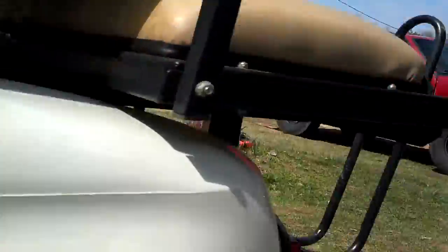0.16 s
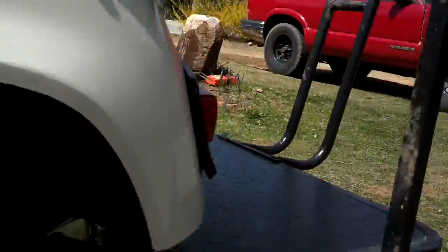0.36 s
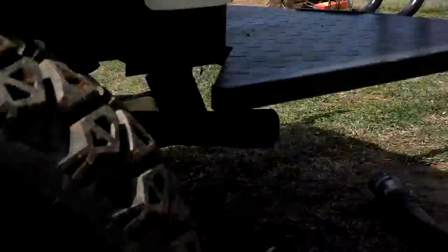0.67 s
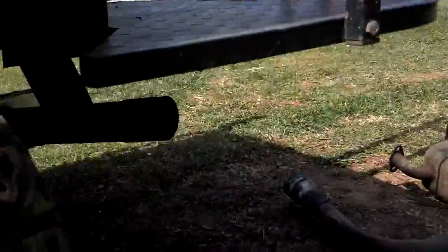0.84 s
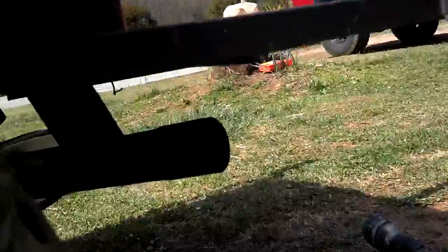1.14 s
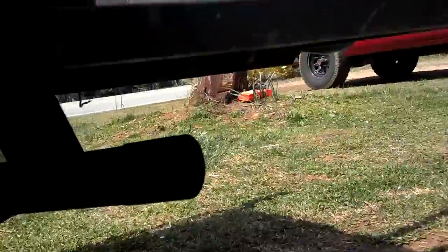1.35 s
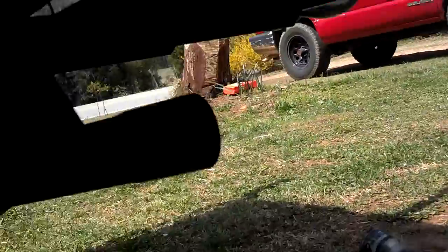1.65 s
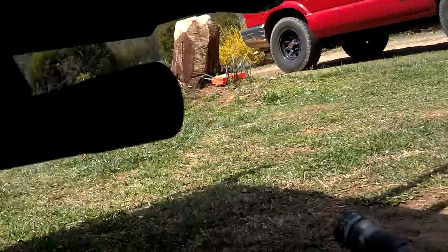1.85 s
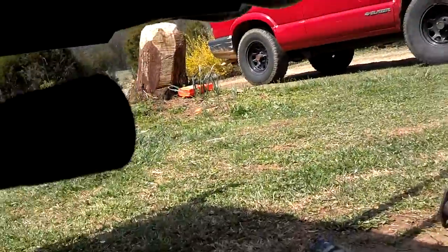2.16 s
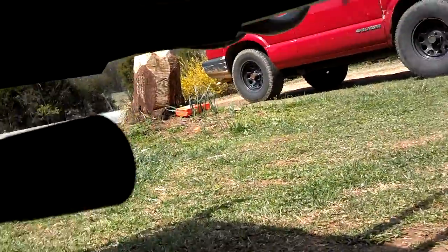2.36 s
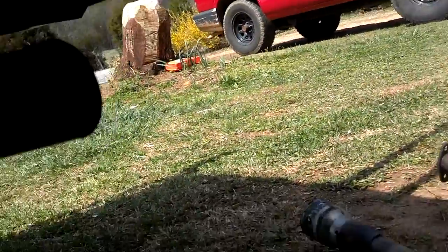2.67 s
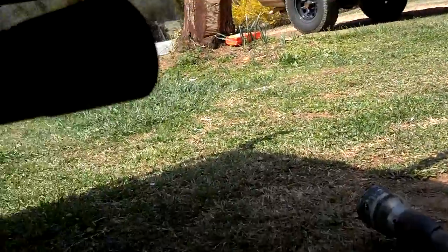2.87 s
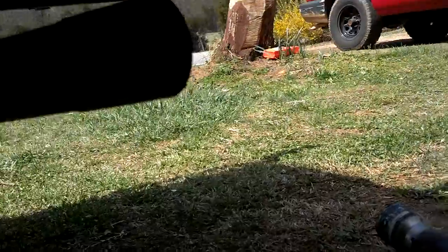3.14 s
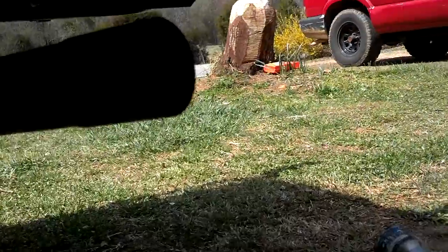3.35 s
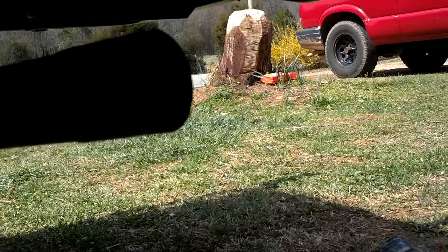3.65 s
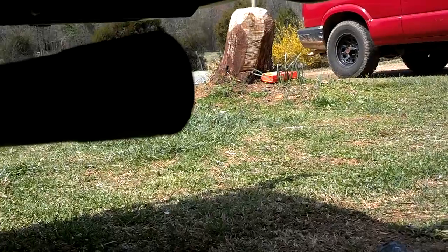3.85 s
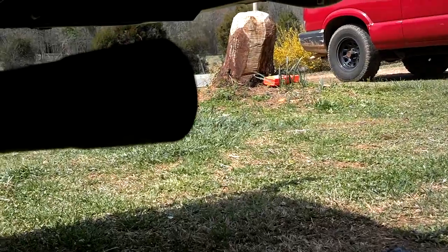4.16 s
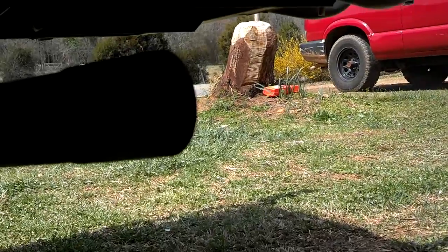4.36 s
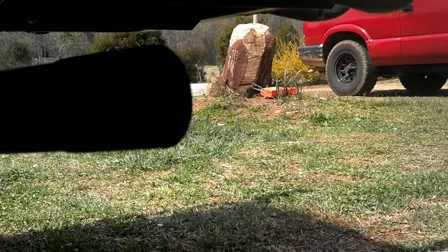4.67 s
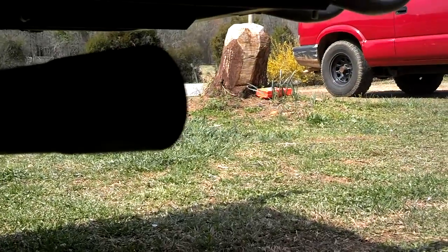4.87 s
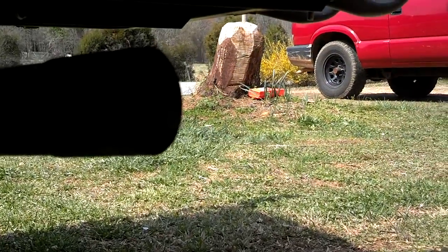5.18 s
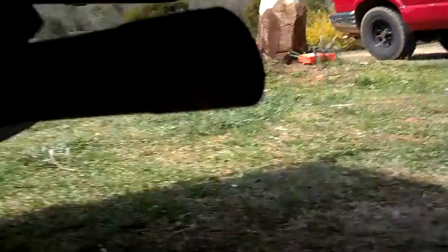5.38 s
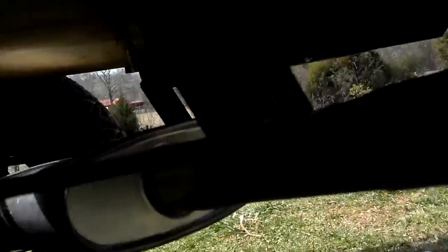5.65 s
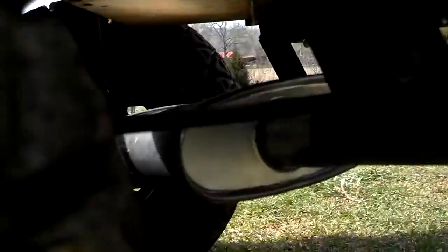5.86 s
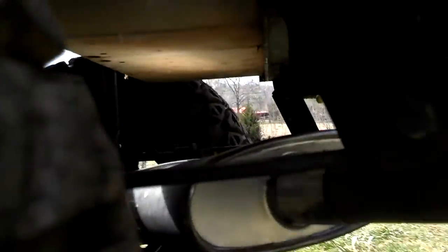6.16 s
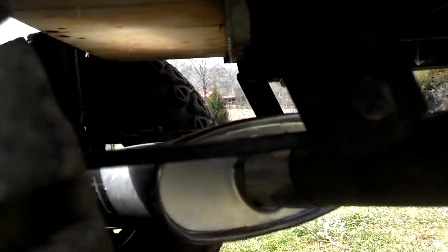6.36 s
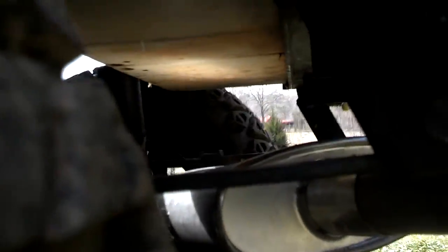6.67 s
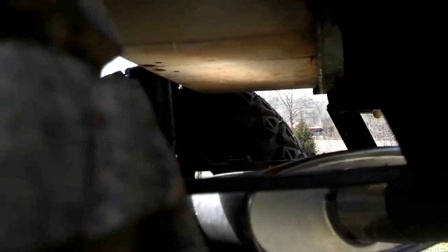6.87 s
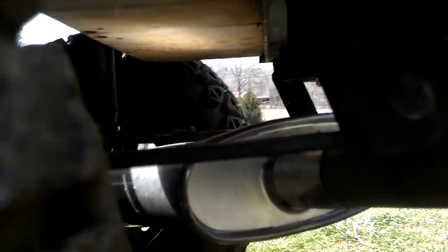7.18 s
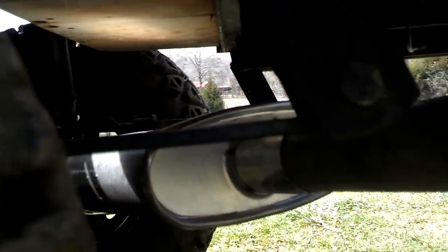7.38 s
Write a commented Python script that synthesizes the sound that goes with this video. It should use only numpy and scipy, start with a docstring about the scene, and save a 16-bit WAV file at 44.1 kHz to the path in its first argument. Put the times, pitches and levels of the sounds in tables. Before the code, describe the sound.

A golf cart's small petrol engine idles roughly outdoors through an open exhaust, coughs, then is revved three times with cracking roars and popping run-downs.

```python
"""A golf cart's small V-twin idles outdoors through an open exhaust, with loose bangs and ringing puffs.
It coughs as the pedal is touched, then is revved three times: each firing cracks and rushes from the pipe.
After each rev it coasts down, gulping and chuffing once a cycle; a few weak pops follow the first rev;
after the last two, gas pops once a cycle. Before the third rev the hand-held microphone pair moves from the
pipe mouth most of the way under the cart. Shaped noise makes the gas and the steady air rumble, filtered
clicks the cracks and thumps, sines the tones."""
import sys
import numpy as np
from scipy import signal
from scipy.fft import rfft, irfft, next_fast_len
from scipy.io import wavfile
from scipy.ndimage import uniform_filter1d

SR = 44100
rng = np.random.default_rng(int(sys.argv[2]) if len(sys.argv) > 2 else 0)


def transcribe(u):
    """Save the signal u as a 16-bit wav file named by the first command-line argument.

    u: samples, shape (n,) or (channels, n), limited to [-1, 1]; the rate is SR.
    q: integer samples, one column per channel.
    """
    v = np.clip(np.atleast_2d(u).T, -1, 1)
    q = np.round(v * 32767).astype(np.int16)
    wavfile.write(sys.argv[1], SR, q)


N = 331632
TIME_S = np.arange(N) / SR
FFT_SIZE = next_fast_len(N + 8192)
FREQS_HZ = np.arange(FFT_SIZE // 2 + 1) * SR / FFT_SIZE
NEAR_PORT = np.array([[1], [0]])   # places a signal at the first port, with no stray part

# Outdoor rumble. Each row: frequency in Hz, relative density in dB per Hz.
AIR_COLOUR = [(20, 4), (45, -17), (90, 12), (250, -46), (2000, -34), (15000, -70)]
# Second port against the first. Each row: frequency in Hz, gain.
FAR_GAIN = [(100, 0.71), (900, 0.65), (3000, 0.28), (9000, 0.75), (12500, 0)]
# Second port against the first. Each row: frequency in Hz, likeness 0-1.
FAR_LIKENESS = [(90, 0.96), (250, 0.73), (500, 0.77), (900, 0.93), (2000, 0.73), (3700, 0.054),
                (6000, 0.24), (12000, 0.038)]
# Path of the microphones. Each row: time in seconds, place (0 by the pipe mouth, 1 under the cart).
MICROPHONE_MOVE = [(5.25, 0.014), (5.7, 0.73)]
# Jet reflections off the ground and the cart's underside. Each row: delay in seconds, level in dB.
ECHOES = [(.0008, -17), (.0019, -20), (.0034, -22), (.0058, -21), (.0093, -22)]
# Broad bark of the pipe. Each row: frequency in Hz, relative density in dB per Hz.
PIPE_COLOUR = [(60, -59), (150, 3.5), (300, -7), (420, -8.5), (530, -5.5), (680, -9), (870, -1.5),
               (1080, -3), (1300, -6), (1480, -21), (1850, -11.5), (2700, -28.5), (5000, -43), (15000, -99)]
# Hiss of the jet. Each row: frequency in Hz, relative density in dB per Hz.
JET_COLOUR = [(500, 1), (1500, 5), (2800, 2.5), (3700, 6), (4000, 2.5), (4300, 3.5), (5500, -1), (7000, -1),
              (8000, -1.5), (9500, -1), (12000, -2.5), (15500, -4)]
# Standing waves of the pipe. Each row: frequency in Hz, width in Hz, relative level in dB.
PIPE_MODES = [(465, 33, -4), (840, 70, -1.5), (1304, 77, -6)]
# Hunting idle, then a stumble as the pedal is touched. Each row: time in seconds, four-stroke cycles per s.
IDLE_SPEED = [(0.0, 10.107), (0.3, 8.495), (0.6, 8.88), (0.9, 8.676), (1.2, 8.552), (1.45, 8.291),
              (1.7, 7.704), (1.92, 9.372), (2.08, 6.902), (2.3, 12.376), (2.55, 13.873), (2.85, 11.474),
              (3.0, 14.732)]
# Blips of the throttle. Each row: opening in seconds, shutting in seconds, top speed in cycles per s,
# easing of the climb 0-1, drag afterwards per s, afterburn in seconds, bark strength in dB.
REVS = [(3.0, 3.46, 26.087, .416, .532, 0, -.7), (4.085, 4.7, 36.218, .087, .572, .95, 0),
        (6.3, 6.96, 31.987, .337, .433, .72, 1.6)]
# Gas pulses at idle, under throttle and coasting. Each row: place in the cycle 0-1, relative level in dB.
IDLE_BEATS = [(.0, 37.5), (0.478, 38)]
PULLING_BEATS = [(.0, 4), (0.257, -1.5), (0.631, 2)]
COASTING_GULPS = [(-.04, 5), (0.27, -13.5), (0.658, 1)]
# Weakened firings. Each row: time in seconds.
MISFIRES_S = [3.388, 6.35]
# Clean overtones of the gas flow, coasting and pulling. Each row: frequency in Hz, level of each in dB.
COAST_TONES = [(150, -60), (200, -50), (270, -52), (345, -40), (400, -49), (480, -41), (540, -41),
               (660, -56)]
PULL_TONES = [(170, -57), (230, -34.5), (300, -35), (370, -40), (445, -48), (560, -34), (660, -51),
              (760, -49)]
# Whistle of each idle puff. Each row: lowest pitch in Hz, highest pitch in Hz, width in Hz, level in dB.
PUFF_COLOURS = [(860, 1200, 90, -29), (1480, 2100, 200, -46), (3180, 8000, 650, -47.5)]
# Idle puffs that ring out clearly. Each row: start in seconds, level in dB, pitch in Hz.
RINGING_PUFFS = [(0.011, -26, 1100), (.208, -30, 915), (.318, -30, 1100), (.778, -25, 883),
                 (.834, -25, 1090), (.886, -29, 920), (1.06, -34, 900), (1.178, -24.5, 1080),
                 (1.24, -28, 960), (1.355, -20.5, 1104), (1.414, -21.5, 912), (1.595, -27, 916),
                 (1.66, -27, 1090), (1.784, -30, 910), (1.902, -25, 930), (1.957, -23.5, 904)]
# Pipe modes lit by afterburn. Each row: frequency in Hz, level in dB.
POP_MODES = [(880, -12.5), (1250, -23)]
# Single bangs and pops of the exhaust, hard and weak, with a louder stretch at the opening.
# Each row: start in seconds, relative level in dB, hiss against bark in dB, boom of the pipe in relative dB.
BANGS = [(0.018, -13, -10, 33), (0.049, -15.5, -6.5, 18), (0.094, -12, -27, 33), (0.432, -14.5, -6, 32),
         (0.496, -6, -16, 31), (0.773, -17, -15, 31), (0.837, -17, -23, 20), (1.002, -7, -16.5, 29),
         (1.062, -11.5, -7.5, 19), (1.116, -9.5, -11, 33), (1.473, -7, -11.5, 31), (1.725, -6, -10.5, 34),
         (1.84, -13, -16, 28), (2.01, -7, -9.5, 33), (2.069, -5, -9.5, 29), (2.15, -4.5, -10.5, 31),
         (2.19, -6, -8, 35), (2.2496, -6.5, -9.5, 41), (2.281, -3.5, -12, 28), (2.33, -10, -8, 31),
         (2.356, -6.5, -9, 35), (2.401, -6.5, -12, 39), (2.879, -4.5, -12, 38), (2.928, -3, -12.5, 38),
         (2.956, -8, -7, 39), (2.998, -2, -13, 35), (3.058, -25, -4, 19), (3.697, -10, -19, 15),
         (3.737, -10, -16, 15), (3.783, -14, -13, 15), (3.915, -11, -9.5, 15), (4.085, 2, -20, 21),
         (6.299, 1.5, -15.5, 21)]

CUTOFF_HZ, AIR_DB = 15450, -39.5
CASING_HZ, CASING_WIDTH_HZ, CASING_DB = 358, 134, -18
HOLLOW_HZ, HOLLOW_WIDTH_HZ, HOLLOW_DB = 490, 220, -11
# crank and throttle
START_PHASE_CYCLES, REST_CYCLES_PER_S = .59, 7.266
REFERENCE_CYCLES_PER_S, IDLE_REFERENCE_CYCLES_PER_S = 30, 8.6
IDLE_ENDS_S, IDLE_FADE_S, OPEN_S, SHUT_S = 2.01, 0.094, 0.031, 0.015
SHUT_PULL = 0.17   # share of firing that goes on with the throttle shut
# exhaust strength at the reference speeds: (bark, hiss, thump)
IDLE_DB, PULLING_DB, COASTING_DB = (-35, -37, -41), (-19.5, -21, -26.5), (-26, -30.5, -21.5)
# added by each doubling of speed, and by afterburn: (bark, hiss, thump)
IDLE_DOUBLING_DB, PULLING_DOUBLING_DB = (11, 9, -16), (2.5, 4.5, -7)
COASTING_DOUBLING_DB, AFTERBURN_DB = (7.5, 7, 8), (2, 6, 1.5)
TONES_DOUBLING_DB = 8.5
# idle
IDLE_UNEVEN_DB, IDLE_JITTER_S = 2, .0022
PUFF_SWELL_S, CRACKLE_PER_S, CRACKLE_DB = 0.0052, 36, -26
# pulling: gas rush and shock front
RUSH_BED, RUSH_SLOW, RUSH_FAST, SHOCK = .18, .74, .34, 0.15   # steady, low-speed, added with speed, front
THROAT_HZ, THROAT_WIDTH_HZ, THROAT_DB = 533, 31, 11.5   # THROAT_DB is against the bark
PULL_THUMP, PULL_THUMP_HZ = 0.82, (73, 138)
CRACK_HZ, RETURN_HZ, RETURN_S, RETURN_DB = (556, 1850), (396, 920), 0.00268, 1.5
FIRING_CRACK_DB, BANG_CRACK_DB, BANG_FRONT_DB = 11, 17, -6   # firing crack is against the bark
BANG_RISE_S, BANG_TAIL = .00037, .05   # the rise shortens with level
# share of the gas noise that repeats every cycle
COAST_REPEAT, PULL_REPEAT, JET_REPEAT = .92, .72, .55
# coasting and afterburn
AFTERBURN_RISE_S, AFTERBURN_FADE_S = 0.12, 0.39
CHUFF_QUIET, CHUFF_BURNING, BARK_CHUFF, AFTERBURN_CHURN = 0.15, 2.1, .9, .4   # relative depths
GULP_UNEVEN_DB = 1
SLOW_GULP, SLOW_GULP_HZ, SLOW_GULP_DB = [(.43, 0)], (169, 249), 0   # higher gulp, between the deep ones
POP_DELAY_S, POP_SPIT_S, POP_SWELL_S, SPIT_SWELL_S = .0106, .0042, .0021, .0019
POP_CRACK_DB, SPIT_DB = -5.5, -24.5
POP_PITCH_EXPONENT = 0.074   # the pipe rings lower as the engine slows and the gas cools
# drone: (engine order, dB against the thump, resonance Hz)
COAST_DRONE, PULL_DRONE = (6, -2.5, 150), (5, -3.5, 120)
DRONE_ONSET, DRONE_OCTAVES = 2.6, .55   # how early the pulses fuse, width of the swell
TONE_WAVER_DB, TONE_WAVER_S = 1, .06


def from_db(db):
    """Decibels to gain."""
    return 10 ** (np.asarray(db) / 20)


def in_time(rows):
    """Each column of a curve, sample by sample."""
    s, *columns = np.transpose(rows)
    return [np.interp(TIME_S, s, column) for column in columns]


def over_hz(points):
    """A table joined by straight lines over log frequency."""
    hz, value = np.transpose(points)
    return np.interp(np.log(FREQS_HZ + 1), np.log(hz), value)


def ramp(start_s, length_s):
    """Rises in a straight line from 0 to 1."""
    return np.clip((TIME_S - start_s) / length_s, 0, 1)


def later(x, delay_s):
    """The same signal, delayed."""
    return np.interp(TIME_S - delay_s, TIME_S, x, left=0)


def colour(x, spectrum):
    """Causal (minimum-phase) filter that keeps the power of white noise."""
    gain = from_db(over_hz(spectrum))
    cepstrum = irfft(np.log(gain / np.sqrt(np.mean(gain ** 2))), FFT_SIZE)
    cepstrum[1:FFT_SIZE // 2] *= 2
    cepstrum[FFT_SIZE // 2 + 1:] = 0
    response = np.exp(rfft(cepstrum))
    return irfft(rfft(x, FFT_SIZE) * response, FFT_SIZE)[..., :N]


def resonance(x, hz, width_hz):
    """Two-pole resonance with gain 1 on top."""
    r = np.exp(-np.pi * width_hz / SR)
    zeros = np.array([1, 0, -1]) * (1 - r * r) / 2
    poles = [1, -2 * r * np.cos(2 * np.pi * hz / SR), r * r]
    return signal.lfilter(zeros, poles, x + 1e-18)


def band(x, edges_hz, order=2):
    """Butterworth band-pass."""
    return signal.sosfilt(signal.butter(order, edges_hz, "band", fs=SR, output="sos"), x + 1e-18)


def fade(x, decay_s):
    """Every click leaves an exponential tail of its own height."""
    return signal.lfilter([1], [1, -np.exp(-1 / (decay_s * SR))], x + 1e-18)


def even(x, size=5000):
    """Holds the power near 1 over a smoothing window of size samples, applied twice."""
    power = np.atleast_2d(x)[0] ** 2
    smooth = uniform_filter1d(uniform_filter1d(power, size), size)
    return x / np.sqrt(np.abs(smooth) + 1e-12)


def swells(clicks, peak_s):
    """Each click starts a swell that peaks and dies; also gives the time since that click and its sample."""
    last = np.maximum.accumulate(np.where(clicks > 0, np.arange(N), 0))
    age_s = TIME_S - TIME_S[last]
    return clicks[last] * age_s / peak_s * np.exp(1 - age_s / peak_s), age_s, last


def waver(size=200):
    """A gain that wanders at random, a step every TONE_WAVER_S, for the drones and overtones."""
    steps = rng.standard_normal(2 * size)
    return from_db(TONE_WAVER_DB * np.interp(TIME_S / TONE_WAVER_S, np.arange(len(steps)), steps))


def beats(crank, pattern, uneven_db, jitter_s):
    """A click whenever the crank passes a place of the pattern, with random level and timing."""
    clicks, cycles = np.zeros(N), np.arange(256)
    for place, db in pattern:
        chance = rng.standard_normal((len(cycles), 2))
        s = np.interp(cycles + place, crank, TIME_S, left=-1, right=-1) + jitter_s * chance[:, 0]
        heard = (s > 0) & (s < TIME_S[-1])
        clicks[(s[heard] * SR).astype(int)] += from_db(db + uneven_db * chance[heard, 1])
    return clicks


def turbulence(crank, repeat, count=1400):
    """Gas noise at two places; a share returns with every cycle, spread evenly over the engine orders."""
    repeat = np.clip(repeat, 0, 1)
    spectrum = np.exp(2j * np.pi * rng.random((2, count // 2 + 1)))
    cycle = irfft(spectrum, count) * np.sqrt(count)
    locked = cycle[:, (crank % 1 * count).astype(int)] * np.sqrt(np.gradient(crank) * count)
    return np.sqrt(repeat) * locked + np.sqrt(1 - repeat) * rng.standard_normal((2, N))


def ports(sound, lag_s, size=16):
    """Two microphone ports; each channel is one port minus the other a moment later, equalised."""
    near, stray = rfft(sound, FFT_SIZE)
    gain, alike = over_hz(FAR_GAIN), np.clip(over_hz(FAR_LIKENESS), 0, 1)
    travel = 2 * np.pi * FREQS_HZ * lag_s
    cross = 2 * np.pi * FREQS_HZ * size / SR
    far = gain * (alike * np.exp(-1j * travel) * near + np.sqrt(1 - alike ** 2) * stray)
    pair = np.array([near, far]) - np.exp(-1j * cross) * np.array([far, near])
    power = 1 + gain ** 2 - 2 * gain * alike * np.cos(cross) * np.cos(travel)
    return irfft(pair / np.sqrt(power + 1e-3), FFT_SIZE)[:, :N]


def outdoor_air():
    """Faint air rumble: steady noise weighted to the lows."""
    rumble = colour(rng.standard_normal((2, N)), AIR_COLOUR)
    return from_db(AIR_DB) * ports(rumble, lag_s=0)


def engine_speed():
    """Each rev climbs to its top speed, ever more slowly; then drag pulls the engine back toward rest."""
    speed, = in_time(IDLE_SPEED)
    for opens, shuts, top, easing, drag, _, _ in REVS:
        start, way = speed[int(opens * SR)], ramp(opens, shuts - opens)
        climb = start + (top - start) * way * (1 + easing * (1 - way))
        run_down = np.exp(-drag * np.maximum(TIME_S - shuts, 0))
        revved = REST_CYCLES_PER_S + (climb - REST_CYCLES_PER_S) * run_down
        speed = np.where(TIME_S > opens, revved, speed)
    return speed


def casing():
    """The engine block whirrs: partly repeating noise through two low-mid resonances."""
    whirr = turbulence(np.cumsum(engine_speed()) / SR, repeat=0.21)
    ringing = resonance(whirr, CASING_HZ, CASING_WIDTH_HZ)
    return from_db(CASING_DB) * resonance(ringing, CASING_HZ, 2 * CASING_WIDTH_HZ)


def hollow(exhaust):
    """The space between the cart's floor and the ground resonates."""
    return from_db(HOLLOW_DB) * resonance(exhaust, HOLLOW_HZ, HOLLOW_WIDTH_HZ)


def echoed(x):
    """The sound with its first reflections, at the same power."""
    paths = 1 + sum(from_db(db) * np.exp(-2j * np.pi * FREQS_HZ * late_s) for late_s, db in ECHOES)
    return irfft(rfft(x, FFT_SIZE) * paths / np.sqrt(np.mean(abs(paths) ** 2)), FFT_SIZE)[..., :N]


def jet_hiss(x):
    """Torn gas hisses at the pipe mouth and reflects nearby."""
    return echoed(colour(x, JET_COLOUR))


def pipe(x):
    """The exhaust pipe: a broad bark with a few standing waves on top."""
    x = colour(x, PIPE_COLOUR)
    return x + sum(from_db(db + 3.5) * resonance(x, hz, width) for hz, width, db in PIPE_MODES)


def throat(x):
    """The pipe's throaty mode, driven only by the pulling roar."""
    return resonance(resonance(x, THROAT_HZ, THROAT_WIDTH_HZ), THROAT_HZ, 3 * THROAT_WIDTH_HZ)


def boom(clicks, hz=84, width_hz=22):
    """The lowest standing wave of the whole pipe rings on after a lone pulse."""
    return resonance(resonance(clicks, hz, width_hz), hz, 3 * width_hz)


def thump(clicks, low_hz=72, high_hz=165):
    """The slug of gas behind each pulse: one short, deep swing."""
    slug = band(-clicks, [low_hz, high_hz])
    return signal.sosfilt(signal.butter(4, 62, "high", fs=SR, output="sos"), slug)


def crack(clicks):
    """A shock front snaps out of the pipe mouth; a duller copy follows after a trip along the pipe."""
    returned = later(band(clicks, RETURN_HZ), RETURN_S) * from_db(RETURN_DB)
    return returned - band(clicks, CRACK_HZ, order=3)


def chuff(crank, depth, place, width):
    """One swell of gas a cycle over a steady flow."""
    return even(1 + depth * np.exp((np.cos(2 * np.pi * (crank - place)) - 1) / width))


def drone(crank, speed, order, db, hz):
    """One engine order swells as it passes the pipe's low resonance."""
    nearness = np.exp(-.5 * (np.log2(order * speed / hz) / DRONE_OCTAVES) ** 2)
    return from_db(db) * nearness * waver() * np.sqrt(2) * np.cos(2 * np.pi * order * crank)


def overtones(crank, speed, spectrum):
    """The higher engine orders glide through the pipe's fixed resonances."""
    hz, db = np.transpose(spectrum)
    tones = 0
    for order in range(7, 26):
        gain = np.interp(order * speed, hz, from_db(db), left=0, right=0)
        tones = tones + gain * waver() * np.cos(2 * np.pi * (order * crank + rng.random()))
    return np.sqrt(2) * tones * from_db(TONES_DOUBLING_DB * np.log2(speed / REFERENCE_CYCLES_PER_S))


def ringing_puffs(swell_s=0.0048, count=2600):
    """Now and then a puff rings the pipe at a pitch of its own."""
    out, age_s = np.zeros(N), np.arange(count) / SR
    swell = age_s / swell_s * np.exp(1 - age_s / swell_s)
    for s, db, hz in RINGING_PUFFS:
        at = int(s * SR)
        out[at:at + count] += from_db(db) * swell * np.sin(2 * np.pi * (hz * age_s + rng.random()))
    return out * NEAR_PORT


def sputter(putts):
    """Idle puffs whistle at random pitches, and small ticks crackle among them."""
    swell, age_s, last = swells(putts / putts.max(), PUFF_SWELL_S)
    out = 0
    for low_hz, high_hz, width_hz, db in PUFF_COLOURS:
        hz = low_hz * (high_hz / low_hz) ** rng.random(N)[last]
        decay_s = 1 / (np.pi * width_hz)
        flutter = fade(fade(rng.standard_normal(N), decay_s), decay_s)
        whistle = np.sqrt(2) * np.sin(2 * np.pi * hz * age_s)
        out = out + from_db(db) * swell * flutter / flutter.std() * whistle
    ticks = (rng.random(N) < CRACKLE_PER_S / SR) * rng.standard_normal(N)
    return (out + from_db(CRACKLE_DB) * colour(ticks, JET_COLOUR)) * NEAR_PORT


def afterfire(crank, speed, burning):
    """Once a cycle unburnt gas lights with a crack, rings the pipe, then spits from its mouth."""
    sparks = np.sqrt(burning) * beats(crank, [(0.00037, 0)], uneven_db=GULP_UNEVEN_DB, jitter_s=0)
    swell, age_s, _ = swells(sparks, POP_SWELL_S)
    warmth = (speed / REFERENCE_CYCLES_PER_S) ** POP_PITCH_EXPONENT
    ring = swell * sum(from_db(db) * np.sin(2 * np.pi * hz * warmth * age_s) for hz, db in POP_MODES)
    pop = later(ring + from_db(POP_CRACK_DB) * pipe(sparks), POP_DELAY_S)
    spit = later(swells(sparks, SPIT_SWELL_S)[0], POP_DELAY_S + POP_SPIT_S)
    spray = from_db(SPIT_DB) * spit * turbulence(crank, repeat=JET_REPEAT)
    return pop * NEAR_PORT + colour(spray, JET_COLOUR)


def bangs(ring_s=0.0076, hiss_s=0.0076, count=4000):
    """A charge burns all at once, hard or weak; the harder the bang, the steeper its front."""
    gas, jet, front, shove = np.zeros((4, N))
    age_s = np.arange(count) / SR
    for s, db, hiss_db, boom_db in BANGS:
        at, rise_s = int(s * SR), BANG_RISE_S * from_db(-1.8 * (db + 8.0))
        decay = np.exp(-age_s / ring_s) + BANG_TAIL * np.exp(-age_s / 0.097)
        swell = (1 - np.exp(-(age_s / rise_s) ** 2)) * decay
        gas[at:at + count] += from_db(db - 13.0) * swell / swell.max()
        jet_swell = (1 - np.exp(-(age_s / (rise_s + 0.0029)) ** 2)) * np.exp(-age_s / hiss_s)
        jet[at:at + count] += from_db(db + hiss_db - 0.5) * jet_swell
        front[at] += from_db(db)
        shove[at] += from_db(boom_db)
    noise = rng.standard_normal((2, 2, N))
    wave = crack(from_db(BANG_CRACK_DB) * front) - pipe(from_db(BANG_FRONT_DB) * front)
    wave += thump(from_db(20.5) * front) + boom(shove)
    return pipe(gas * noise[0]) + jet_hiss(jet * noise[1]) + wave * NEAR_PORT


def running_state():
    """Shares of idling, open throttle and coasting, and of gas that burns off in the pipe after a rev."""
    idling = 1 - ramp(IDLE_ENDS_S, IDLE_FADE_S)
    opened = burning = 0
    for opens, shuts, _, _, _, burn_s, _ in REVS:
        opened = opened + ramp(opens, OPEN_S) - ramp(shuts - SHUT_S / 3, SHUT_S)
        dying = ramp(shuts + burn_s - AFTERBURN_FADE_S, AFTERBURN_FADE_S)
        burning = burning + ramp(shuts - SHUT_S, AFTERBURN_RISE_S) * (1 - dying)
    coasting = 1 - idling - opened
    return np.clip([idling, opened, coasting, burning * coasting], 0, 1)


def exhaust_levels(speed, idling, opened, coasting, burning):
    """Bark, hiss and thump in dB: each way of running has its own levels, and they follow the speed."""
    doublings = np.log2(speed / REFERENCE_CYCLES_PER_S)
    idle_doublings = np.log2(speed / IDLE_REFERENCE_CYCLES_PER_S)
    levels = np.outer(IDLE_DB, idling) + np.outer(IDLE_DOUBLING_DB, idling * idle_doublings)
    levels += np.outer(PULLING_DB, opened) + np.outer(PULLING_DOUBLING_DB, opened * doublings)
    levels += np.outer(COASTING_DB, coasting) + np.outer(COASTING_DOUBLING_DB, coasting * doublings)
    bark_db, hiss_db, thump_db = levels + np.outer(AFTERBURN_DB, burning)
    strength_db = 0
    for opens, *_, db in REVS:
        strength_db = np.where(TIME_S > opens, db, strength_db)
    return bark_db + strength_db, hiss_db, thump_db


def idle_putts(crank, putts):
    """At idle the valves let out soft puffs; gives bark, jet strength and low thump."""
    puff = even(fade(fade(fade(putts, 0.00039), 0.0059), 0.0066))
    bark = even(puff + 3.9) * turbulence(crank, repeat=0.1)
    low = 1.8 * even(boom(putts)) + 0.064 * even(thump(putts))
    return bark, even(puff + 0.65), low


def coasting_chuffs(crank, fused, burning):
    """Shut throttle: gulps and a chuff a cycle, deeper and more churned with afterburn; bark, jet, low."""
    depth = CHUFF_QUIET + CHUFF_BURNING * burning / (0.043 + fused) ** 3
    churn = turbulence(crank, repeat=COAST_REPEAT * (1 - AFTERBURN_CHURN * burning))
    bark = chuff(crank, BARK_CHUFF * depth, place=0.44, width=0.36) * churn
    jet = chuff(crank, 6 * depth, place=0.51, width=0.55)
    gulps = beats(crank, COASTING_GULPS, uneven_db=GULP_UNEVEN_DB, jitter_s=0)
    slow_gulps = beats(crank, SLOW_GULP, uneven_db=GULP_UNEVEN_DB, jitter_s=0)
    low = even(thump(gulps, low_hz=68.0, high_hz=175.0))
    low += from_db(SLOW_GULP_DB) * np.exp(-10 * fused) * even(band(slow_gulps, SLOW_GULP_HZ))
    return bark, jet, low


def pulling_cracks(crank, fused, opened):
    """Each firing sends a shock front, then a rush of gas; gives roar, jet strength, low thump and shock."""
    burns = 1 - sum(np.exp(-((TIME_S - s) / .008) ** 2) for s in MISFIRES_S)
    firings = burns * beats(crank, PULLING_BEATS, uneven_db=2.5, jitter_s=0.00028)
    rush = even(even(fade(fade(firings, 0.00071), 0.0085)) + RUSH_BED + .5 * fused)
    shock = even(np.sqrt(np.abs(firings))) / (1 + fused)
    strength = RUSH_SLOW + RUSH_FAST * np.minimum(fused, 1)
    roar = strength * rush * turbulence(crank, repeat=PULL_REPEAT) - SHOCK * opened * shock * NEAR_PORT
    jet = even(even(fade(fade(firings, 0.0034), 0.0043)) + 0.3 + 0.2 * fused)
    low = PULL_THUMP * even(thump(firings, *PULL_THUMP_HZ))
    return roar, jet, low, shock


def engine():
    """Idling putts, pulling cracks and coasting chuffs share the same pipe, jet and thump."""
    speed = engine_speed()
    crank = START_PHASE_CYCLES + np.cumsum(speed) / SR
    idling, opened, coasting, burning = running_state()
    bark_db, hiss_db, thump_db = exhaust_levels(speed, idling, opened, coasting, burning)
    shares = [idling, opened + SHUT_PULL * coasting, (1 - SHUT_PULL) * coasting]
    idle, pull, coast = np.sqrt(np.clip(shares, 0, 1))
    fused = (speed / REFERENCE_CYCLES_PER_S) ** 3   # at speed the pulses run into each other

    putts = beats(crank, IDLE_BEATS, uneven_db=IDLE_UNEVEN_DB, jitter_s=IDLE_JITTER_S)
    idle_bark, idle_jet, idle_low = idle_putts(crank, putts)
    pull_roar, pull_jet, pull_low, shock = pulling_cracks(crank, fused, opened)
    coast_bark, coast_jet, coast_low = coasting_chuffs(crank, fused, burning)

    roar = pull * pull_roar
    bark = idle * idle_bark + roar + coast * coast_bark
    body = pipe(bark * from_db(bark_db)) + throat(roar) * from_db(bark_db + THROAT_DB)
    jet = idle * idle_jet + pull * pull_jet + coast * coast_jet
    torn = turbulence(crank, repeat=JET_REPEAT * np.minimum(fused, 1))
    hiss = jet_hiss(jet * from_db(hiss_db) * torn)
    low = idle * idle_low + opened * pull_low + coast * coast_low
    drones = coast * drone(crank, speed, *COAST_DRONE) - opened * drone(crank, speed, *PULL_DRONE)
    low += np.minimum(DRONE_ONSET * fused, 1) * drones
    tones = coasting * overtones(crank, speed, COAST_TONES) + opened * overtones(crank, speed, PULL_TONES)
    cracks = crack(opened * shock * from_db(bark_db + FIRING_CRACK_DB))
    flow = body + hiss + (low * from_db(thump_db) + tones + cracks) * NEAR_PORT
    return flow + idle * sputter(putts) + afterfire(crank, speed, burning)


def scene():
    """The exhaust is first to the left of the microphones, then nearer straight ahead; air rumbles faintly."""
    air = outdoor_air()
    exhaust = engine() + bangs() + ringing_puffs()
    moved, = np.clip(in_time(MICROPHONE_MOVE), 0, 1)
    beside = ports(exhaust, lag_s=0.0002)
    under = ports(exhaust + hollow(exhaust) + casing(), lag_s=-0.000011)
    return (1 - moved) * beside + moved * under + air


def record(dry):
    """Only the highest peaks are rounded; the top is cut."""
    rounded = dry / (1 + dry ** 6) ** (1 / 6)
    return signal.sosfilt(signal.ellip(10, .1, 80, CUTOFF_HZ, fs=SR, output="sos"), rounded)


dry = scene()
out = record(dry)
transcribe(out)
```